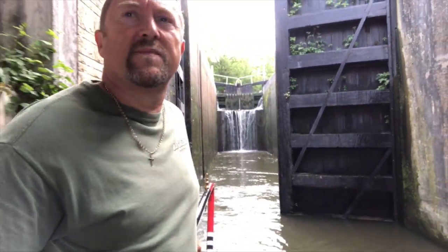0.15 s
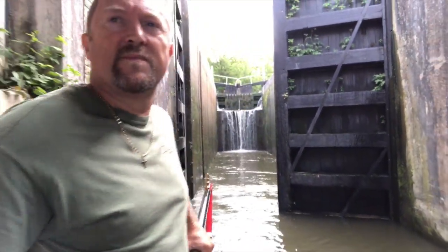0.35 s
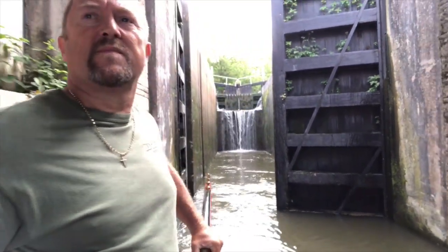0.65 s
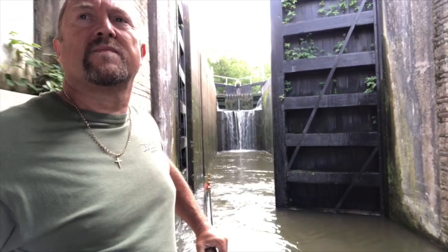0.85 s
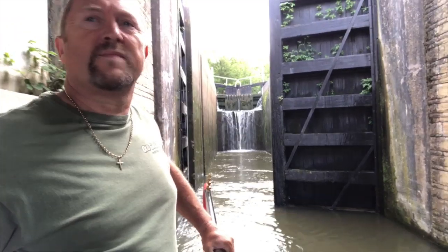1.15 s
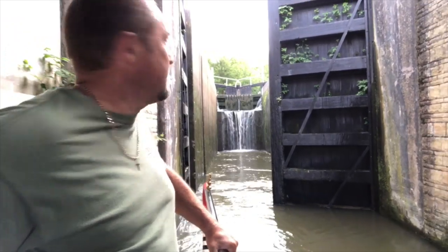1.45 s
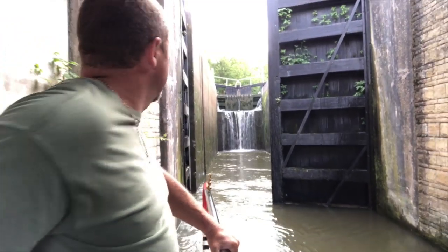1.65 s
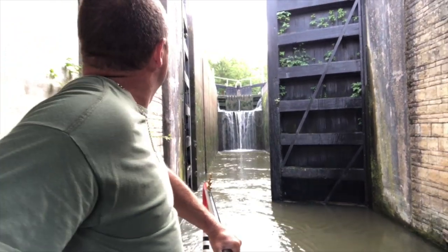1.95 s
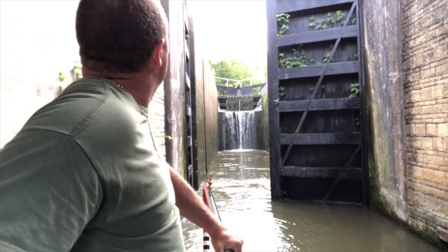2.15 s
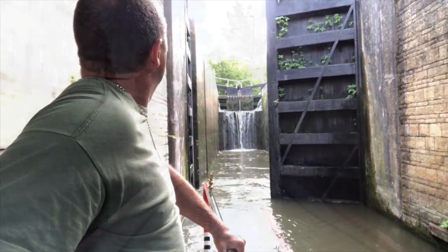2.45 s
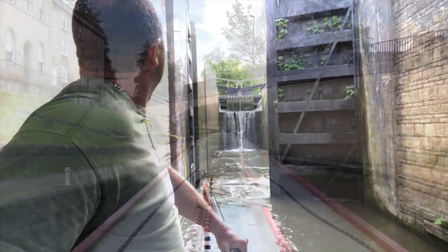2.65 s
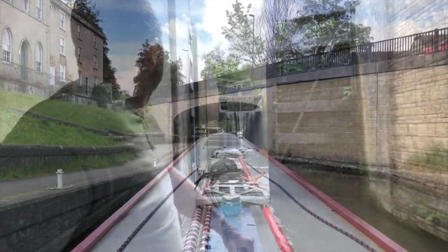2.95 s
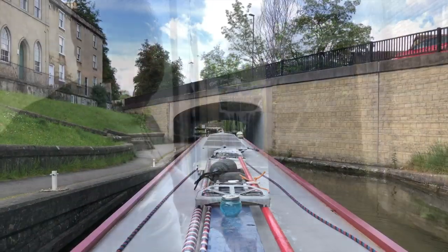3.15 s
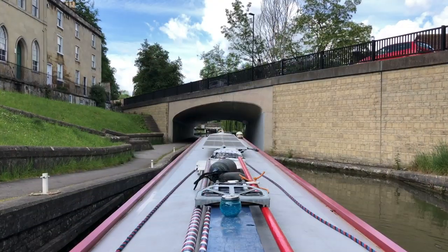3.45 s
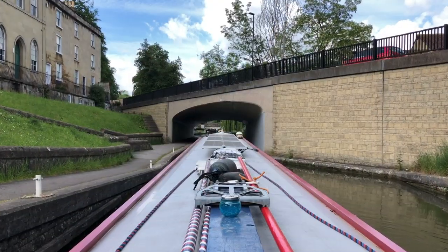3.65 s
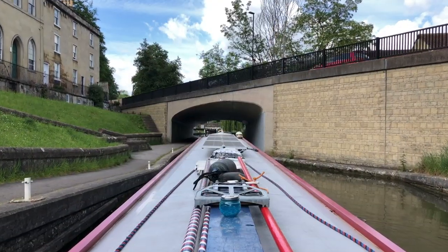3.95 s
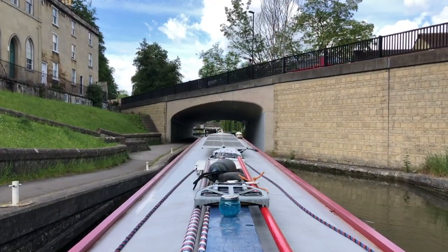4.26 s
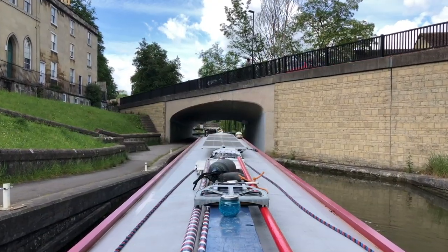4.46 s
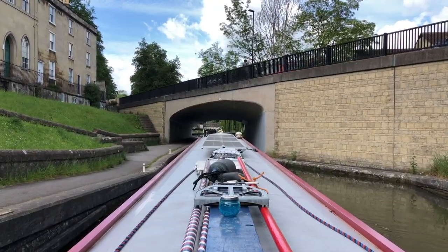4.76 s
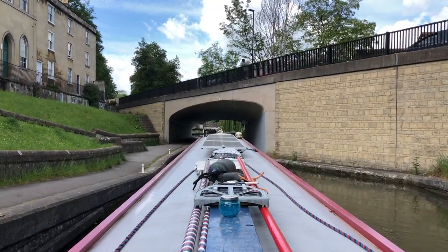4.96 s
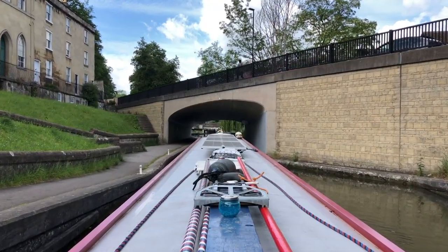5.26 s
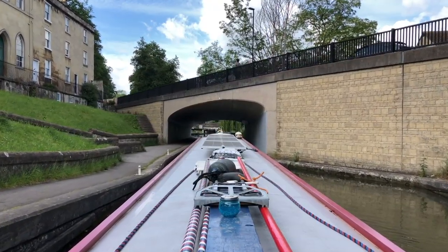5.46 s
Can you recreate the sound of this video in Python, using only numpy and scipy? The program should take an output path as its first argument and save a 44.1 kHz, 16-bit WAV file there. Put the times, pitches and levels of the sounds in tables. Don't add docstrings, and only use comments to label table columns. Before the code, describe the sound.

Inside a narrow brick canal lock, a boat's diesel holds a strong, low, booming hum while leaking water pours steadily, gurgling and hissing with fine spray. Midway the sound crossfades smoothly to the open canal: the water hiss disappears, the engine throbs more softly, a loose panel rattles quickly, and wash murmurs along the hull. One-channel sound from a microphone aboard, with a slightly patchy treble.

```python
import sys
import numpy as np
from scipy import signal
from scipy.fft import rfft, irfft, next_fast_len
from scipy.io import wavfile
from scipy.ndimage import uniform_filter1d, map_coordinates

SR = 44100
rng = np.random.default_rng(int(sys.argv[2]) if len(sys.argv) > 2 else 0)


def convert_level_to_amplitude(level_db):
    exponent = np.asarray(level_db, float) / 20
    return 10 ** exponent


def wav_record(signal):
    frames = np.transpose(np.atleast_2d(signal))
    bounded = np.clip(frames, -1, 1)
    quanta = np.round(bounded * 32767).astype(np.int16)
    wavfile.write(sys.argv[1], SR, quanta)


N = 247401

# (firing cycles at start [cycles], firing rate [1/s], drift [1/s per s])
LOCK_ENGINE = (.937, 28.248, -.0077)
CUT_ENGINE = (.914, 28.247, -.0099)
LOCK_LEADS = [-.29, .32, 0, .13, -.03, .24]
CUT_LEADS = [.05, -.36, .46, .05, 0, .16]
# (direct level [dB], echo over direct [0-1], time when in step [s], beat period [s])
LOCK_ORDERS = [(-56, .05, 1.5, 3), (-35, 0.96, 0.15, 3.7), (-14, 0, 1.8, 3), (-48, 0.66, 2.4, 5.4),
               (-40, 0.35, 2.25, 2.35), (-46.5, 0.2, 1.5, 3)]
CUT_ORDERS = [(-49, .05, 3.5, 3), (-25, 0.087, 5.4, 3.2), (-26.8, 0.32, 4.48, 2.56), (-38, 0.64, 3.9, 2.12),
              (-33, 0.11, 3.15, 3.7), (-42.5, 0.22, 3.87, 1.9)]
# (time [s], lift [dB], lead [cycles])
CHAMBER_BOOM = [
    (0, -1, -.02),
    (.7, .9, .02),
    (1.05, -.5, 0),
    (1.7, 1.3, -.01),
    (2.4, 3, .01),
    (3.3, 2.6, .2),
]
# (frequency [Hz], level [dB])
POUR_COLOUR = [(110, -9), (190, -1.5), (248, -9), (291, -2), (354, -6.5), (480, -4.5), (675, -7.5),
               (1260, -8.5), (3500, -21.5), (4550, -72), (7700, -120)]
SPRAY_COLOUR = [(880, -23), (1500, -5), (2730, -6.5), (3780, -5), (7590, -10), (8370, -14), (13800, -19),
                (15700, -22)]
RUMBLE_COLOUR = [(15, -30), (30, -14), (70, 5.5), (120, 1), (200, -1.5), (300, -7), (500, -48)]
WASH_COLOUR = [(110, -24), (190, -11.5), (251, -3), (330, -7.5), (506, -11), (643, -12.5), (930, -9.5),
               (1680, -17.5), (2770, -24), (4400, -28), (4950, -32.5), (5500, -30.5), (8000, -38),
               (15700, -52)]
CLATTER_COLOUR = [(1000, -30), (2000, -4), (3500, -1), (4900, -5), (5500, -6), (8000, -13.5), (12000, -22),
                  (15700, -31)]
DRONE_COLOUR = [(150, -40), (210, -1.5), (250, -3), (310, -3), (350, -14), (500, -60)]
# (time [s], lift [dB])
WATER_SLUGS = [
    (.17, 1),
    (1.05, 2),
    (1.72, 0.2),
    (2.08, 0.9),
    (2.53, 0),
]
# (frequency [Hz], width [Hz], level [dB])
PANEL_MODES = [(2180, 130, -4.5), (2630, 66, 1), (2880, 31, -2), (5400, 270, -19)]
# (time [s], peak level [dB])
VALVE_TICKS = [
    (3.5208, -65),
    (3.877, -51),
    (3.9808, -52),
    (4.763, -50),
    (5.0124, -54),
    (5.1177, -55),
    (5.1875, -47),
    (5.2225, -48),
]
# (time [s], peak level [dB], pitch [Hz])
PANEL_KNOCKS = [(3.319, -33, 2660), (3.382, -38, 2630), (3.5581, -35, 2650), (3.6253, -39, 2820),
                (3.66, -35, 2740), (3.7021, -36, 2565), (3.735, -38, 2610), (3.768, -37, 2860),
                (3.8787, -37, 2800), (3.942, -36, 2655), (3.9824, -38, 2880), (4.02, -35, 2860),
                (4.054, -35, 2640), (4.3366, -37, 2670), (4.55, -37, 2920), (4.761, -39, 2820),
                (5.008, -41, 2740), (5.186, -33, 2700), (5.543, -40, 2660)]
# (time [s], lift [dB])
DRONE_SWELLS = [
    (3.65, 4),
    (4.05, 8),
    (4.85, 6.5),
    (5.3, 4.5),
]
# (middle [s], half-length [s], share of top cells nearly empty [0-1])
TREBLE_GAPS = [
    (.6, .65, .12),
    (3.9, .8, .24),
]

DISSOLVE_START_S, DISSOLVE_LENGTH_S = 2.483, 1
POUR_DB, SPRAY_DB, SLUG_WIDTH_S = -29, -33, 0.047
CLATTER_DB, RATTLE_DB = -56.5, -49
SETTLE_TIME_S, SETTLE_WIDTH_S = 4.26, .15
KNOCK_LENGTH_S = 0.035
WASH_DB, DRONE_DB, SWELL_WIDTH_S = -36, -44.5, 0.081
TOP_HZ = 15730


def unit(x):
    return x / np.sqrt(np.mean(x ** 2) + 1e-20)


def curves(rows):
    times, *columns = np.transpose(rows)
    return [np.interp(np.arange(N) / SR, times, column) for column in columns]


def bumps(rows, width_s):
    t = np.arange(N) / SR
    return sum(height * np.exp(-((t - s) / width_s) ** 2) for s, height in rows)


def wobble(rate):
    return map_coordinates(rng.standard_normal(int(N * rate / SR) + 4), [np.arange(N) * rate / SR])


def filtered(x, response):
    size = next_fast_len(N + SR // 2)
    hz = np.fft.rfftfreq(size, 1 / SR)
    return irfft(rfft(x, size) * response(hz), size)[:N]


def coloured(x, spectrum):
    f, db = np.transpose(spectrum)
    return unit(filtered(x, lambda hz: convert_level_to_amplitude(np.interp(np.log(hz + 1), np.log(f + 1), db))))


def patchy(depth_db):
    z = signal.stft(rng.standard_normal(N), nperseg=512)[2]
    field = uniform_filter1d(rng.standard_normal(z.shape), size=6, axis=0)
    field = uniform_filter1d(field, size=12, axis=1)
    return signal.istft(z * convert_level_to_amplitude(depth_db * unit(field)), nperseg=512)[1][:N]


def cycles(engine):
    start, rate, drift = engine
    t = np.arange(N) / SR
    return start + rate * t + drift * t ** 2 / 2


def exhaust(engine, leads, orders, boom, unsteady_db):
    turn = cycles(engine)
    t = np.arange(N) / SR
    out = 0
    for k, ((db, echo, step_s, period_s), lead, waver_db) in enumerate(zip(orders, leads, unsteady_db)):
        lift_db, shift = boom if k == 2 else (0, 0)
        angle = 2 * np.pi * ((k + 1) * turn + lead + shift)
        echo_lag = 2 * np.pi * (t - step_s) / period_s
        tone = np.cos(angle) + echo * np.cos(angle - echo_lag)
        out = out + np.sqrt(2) * convert_level_to_amplitude(db + lift_db + waver_db * wobble(7)) * tone
    return out


def droplets(count, spread_db):
    where, size, sign = rng.random((count, 3)).T
    clicks = np.sign(sign - .5) * convert_level_to_amplitude(-spread_db * np.log(size))
    return np.bincount((where * N).astype(int), clicks, N)


def bubbles(count, middle_hz):
    length = 1200
    where, size = rng.random((count, 2)).T
    hz = middle_hz * np.exp(0.441 * rng.standard_normal(count))[:, None]
    cycle = hz * np.arange(length) / SR
    envelope = cycle * np.exp(-cycle / 2.1)
    tones = convert_level_to_amplitude(5.3 * size)[:, None] * np.sin(2 * np.pi * (cycle + 0.013 * cycle ** 2)) * envelope
    index = (where * N).astype(int)[:, None] + np.arange(length)
    return unit(np.bincount(index.ravel(), tones.ravel(), N + length)[:N])


def falling_water():
    pour_db = POUR_DB + bumps(WATER_SLUGS, SLUG_WIDTH_S)
    surge = wobble(1.65)
    pour_gain = convert_level_to_amplitude(pour_db + 0.37 * surge + 0.49 * wobble(11.37))
    pour = pour_gain * coloured(patchy(depth_db=1.03), POUR_COLOUR)
    gurgle = convert_level_to_amplitude(pour_db - 13.5) * bubbles(count=2500, middle_hz=805)
    fizz = unit(patchy(depth_db=0.44)) + 0.69 * unit(droplets(count=20000, spread_db=1.5))
    spray = convert_level_to_amplitude(SPRAY_DB + 0.22 * surge + 0.46 * wobble(12.5)) * coloured(fizz, SPRAY_COLOUR)
    rumble = convert_level_to_amplitude(-36.5 + 0.54 * wobble(5)) * coloured(patchy(depth_db=0.0), RUMBLE_COLOUR)
    return pour + gurgle + spray + rumble


def panel_response(hz):
    out = 0
    for k, (centre, width, db) in enumerate(PANEL_MODES):
        ringing = 1j * hz * width / (centre * centre - hz * hz + 1j * hz * width)
        out = out + (-1) ** k * convert_level_to_amplitude(db) * ringing
    return out


def valve_gear():
    settled = .5 + .5 * np.tanh((np.arange(N) / SR - SETTLE_TIME_S) / SETTLE_WIDTH_S)
    turn = cycles(CUT_ENGINE) + 0.05
    number = np.floor(turn).astype(int)
    within = turn - number
    clatter_shape = np.exp(-((within - 0.45) / 0.16) ** 2)
    rattle_shape = np.exp(-((within - 0.49) / 0.32) ** 2)
    firing, shake = rng.uniform(-1.8, 1, (number.max() + 2, 2))[number].T
    firing = firing + 0.13 * (-1.) ** number
    clatter = clatter_shape * convert_level_to_amplitude(2.4 * firing) * rng.standard_normal(N)
    clatter = coloured(clatter, CLATTER_COLOUR)
    rattle = rattle_shape * convert_level_to_amplitude(1.9 * firing + 1.6 * shake) * rng.standard_normal(N)
    rattle = unit(filtered(rattle, panel_response))
    return convert_level_to_amplitude(CLATTER_DB - 1.3 * settled) * clatter + convert_level_to_amplitude(RATTLE_DB - 3 * settled) * rattle


def valve_ticks():
    out = np.zeros(N + SR)
    t = np.arange(400) / SR
    for s, db in VALVE_TICKS:
        gain = convert_level_to_amplitude(db - 3 - 60 * t / .03) * (1 - np.exp(-t / .0008))
        out[round(s * SR):][:len(t)] += gain * rng.standard_normal(len(t))
    return out[:N]


def gear_whine():
    return convert_level_to_amplitude(-54 + 1.2 * wobble(7.0)) * np.cos(2 * np.pi * 18 * cycles(CUT_ENGINE))


def knocks():
    out = np.zeros(N + SR)
    t = np.arange(round(KNOCK_LENGTH_S * SR)) / SR
    envelope = np.sin(np.pi * (t / t[-1]) ** 0.63) ** 2
    for s, db, hz in PANEL_KNOCKS:
        blur = np.cumsum(0.086 * rng.standard_normal(len(t)))
        angle = 2 * np.pi * hz * t + blur
        ring = np.sin(angle) + 0.18 * np.sin(2 * angle)
        out[round(s * SR):][:len(t)] += convert_level_to_amplitude(db - 7.0) * ring * envelope
    return out[:N]


def wash():
    push_db = 0.62 * np.cos(2 * np.pi * (cycles(CUT_ENGINE) - .39))
    slide = convert_level_to_amplitude(WASH_DB + 0.26 * wobble(3.86) + push_db) * coloured(patchy(depth_db=1.0), WASH_COLOUR)
    gurgle = convert_level_to_amplitude(WASH_DB - 9.0) * bubbles(count=900, middle_hz=746)
    rumble = convert_level_to_amplitude(-38.5 + 0.6 * wobble(4.6)) * coloured(patchy(depth_db=1.5), RUMBLE_COLOUR)
    return slide + gurgle + rumble


def engine_bay_drone():
    drone_db = DRONE_DB + bumps(DRONE_SWELLS, SWELL_WIDTH_S)
    throb = 1 + 0.41 * np.cos(4 * np.pi * (cycles(CUT_ENGINE) - .46))
    return convert_level_to_amplitude(drone_db + 1.7 * wobble(7.6)) * throb * coloured(patchy(depth_db=2.0), DRONE_COLOUR)


def scene():
    progress = np.clip((np.arange(N) / SR - DISSOLVE_START_S) / DISSOLVE_LENGTH_S, 0, 1)
    cut_share = np.sin(np.pi / 2 * progress) ** 2
    lock_waver_db = [1.2, .8, 0.083, 0.7, 1.1, 2.2]
    cut_waver_db = [1.2, .25, 0.14, 0.6, 0.44, 1.7]
    lock = exhaust(LOCK_ENGINE, LOCK_LEADS, LOCK_ORDERS, curves(CHAMBER_BOOM), lock_waver_db)
    lock = lock + falling_water()
    cut = exhaust(CUT_ENGINE, CUT_LEADS, CUT_ORDERS, (0, 0), cut_waver_db)
    cut = cut + valve_gear() + valve_ticks() + gear_whine() + knocks() + wash() + engine_bay_drone()
    return ((1 - cut_share) * lock + cut_share * cut)[None]


def gappy_treble(x):
    hz, t, z = signal.stft(x, SR, nperseg=1024)
    luck = rng.random((len(hz) // 3 + 1, len(t) // 4 + 1))
    luck = luck.repeat(3, axis=0).repeat(4, axis=1)[:len(hz), :len(t)]
    spells = .02 + sum(top * np.exp(-((t - s) / half) ** 2) for s, half, top in TREBLE_GAPS)
    share = spells * np.clip((hz[:, None] - 7500) / 6500, 0, 1.3) ** 2
    return signal.istft(z * np.where(luck < share, .03, 1), SR, nperseg=1024)[1][:N]


def treble_response(hz):
    return np.where(hz > 7950, convert_level_to_amplitude(0.5), 1) * (hz < TOP_HZ)


def roll_off(x):
    return signal.sosfilt(signal.butter(12, 16120, fs=SR, output="sos"), x)


def record(dry):
    mix = filtered(gappy_treble(dry[0]), treble_response)[None]
    return roll_off(mix)


dry = scene()
out = record(dry)
wav_record(out)
```